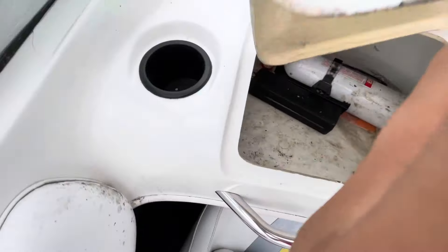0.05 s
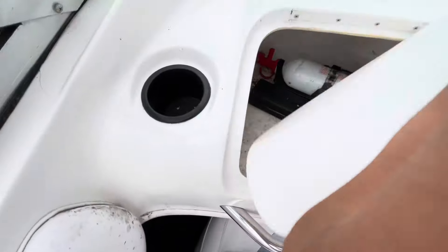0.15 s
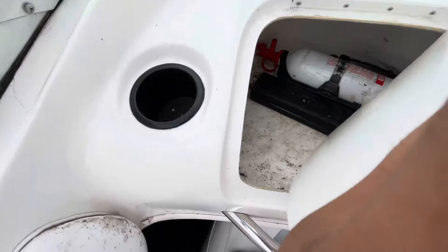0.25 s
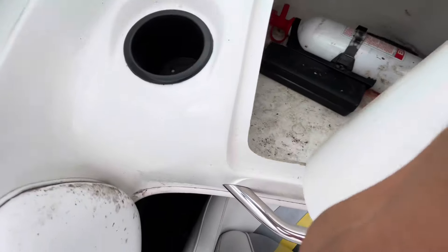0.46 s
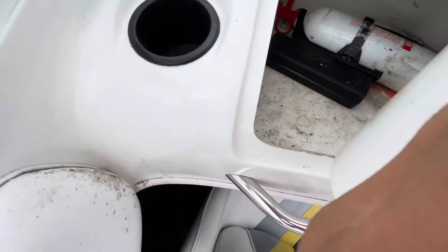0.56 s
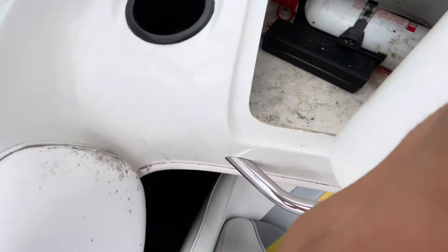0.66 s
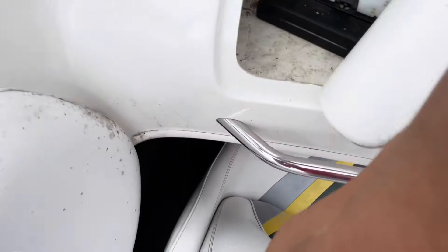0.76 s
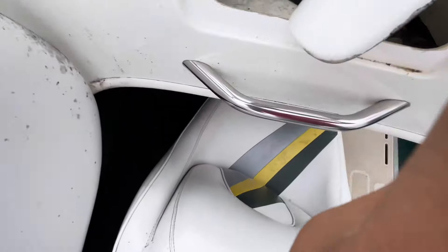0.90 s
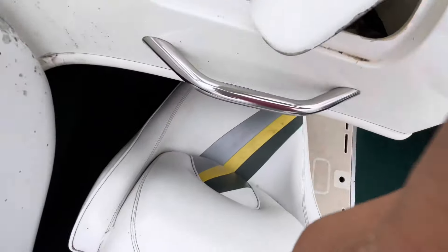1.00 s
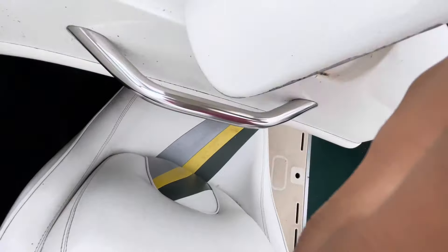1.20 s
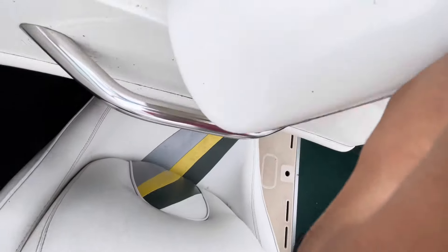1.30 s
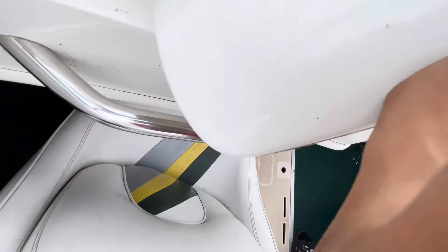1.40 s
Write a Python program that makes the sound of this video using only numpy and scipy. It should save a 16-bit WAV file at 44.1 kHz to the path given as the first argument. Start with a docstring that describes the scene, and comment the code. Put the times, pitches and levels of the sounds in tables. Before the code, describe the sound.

A fibreglass compartment lid on a boat knocks loudly twice, close by, with a latch rattle between. It scrapes and judders along the rim, then bumps down on its padding, over faint engine hum and outdoor hiss.

```python
"""A padded fibreglass compartment lid handled close by on a boat, over engine hum and outdoor hiss.
First two loud knocks, a latch rattle between: the edge cracks, the lid bends, the compartment booms.
Gain control ducks after them. The lid then scrapes and judders along the rim in stick-slip, tapping it.
Its cushion brushes past and the lid bumps down on it, from about 1.1 s. Last, wind rumble picks up."""
import sys
import numpy as np
from scipy import signal
from scipy.fft import rfft, irfft
from scipy.io import wavfile
from scipy.ndimage import uniform_filter1d

SR = 44100
rng = np.random.default_rng(int(sys.argv[2]) if len(sys.argv) > 2 else 0)


def generate_wav(signal):
    """Clip the signal to [-1, 1] and save it as 16-bit WAV at the path in sys.argv[1]."""
    frames = np.transpose(np.atleast_2d(signal))
    scaled = np.clip(frames, -1, 1) * 32767
    pcm = np.round(scaled).astype(np.int16)
    wavfile.write(sys.argv[1], SR, pcm)


N = 63945

# Spectra: level per Hz, shape only. Pan: left minus right. Phase: between the two microphone ports.
# Outdoor hiss: f/Hz, level/dB
HISS_SPECTRUM = [(30, 6), (200, -17.5), (400, -3), (560, -3), (680, -7), (810, 7), (1020, 1), (1200, -4.5),
                 (1400, -2), (2200, -11), (4000, -17), (6000, -31.5), (8000, -41), (11000, -65.5),
                 (14000, -81)]
# Distant whine: f/Hz, level/dB
WHINE_TONES = [(808, -55.5), (1040, -63)]
# Hiss and whine gain, rising as the microphone turns from the compartment: t/s, level/dB
OUTDOOR_GAIN = [(0, -7.5), (.45, 0.5), (.75, 0.5), (1.44, 0)]
# Wind on the microphone: f/Hz, level/dB
WIND_SPECTRUM = [(15, -24.5), (30, -17.5), (48, 0), (68, 3), (100, -11), (150, -4), (300, -46),
                 (1000, -72.5)]
# Gusts: t/s, level/dB
WIND_LEVEL = [(0, -43.5), (.15, -45), (.22, -44), (.45, -41), (.8, -40.5), (1.05, -39.5), (1.19, -32),
              (1.23, -29), (1.31, -35.5), (1.355, -28), (1.39, -32), (1.44, -31)]
# Hollow murmur of the shifting lid: f/Hz, level/dB
MURMUR_SPECTRUM = [(60, -20), (160, 4), (225, 6), (295, 7), (370, -14.5), (500, -19), (1200, -68)]
# Murmur envelope: t/s, level/dB
MURMUR_LEVEL = [(0, -35), (.1, -36.5), (.21, -35.5), (.27, -21), (.4, -43), (.6, -32), (.75, -52),
                (.97, -52.5), (1.04, -38), (1.1, -48.5), (1.2, -39.5), (1.27, -50), (1.44, -54)]
# Fine rustle: f/Hz, level/dB
RUSTLE_SPECTRUM = [(300, -28), (1500, 9.5), (4000, -0.5), (5600, -8.5), (7800, -21.5), (10300, -23),
                   (13000, -54.5), (16000, -69)]
# Rustle envelope: t/s, level/dB
RUSTLE_ENVELOPE = [(0, -50.5), (.16, -46.5), (.4, -53), (.7, -51.5), (.95, -68), (1.1, -53.5), (1.3, -53.5),
                   (1.44, -56)]
# Cushion brushing past: f/Hz, level/dB
BRUSH_SPECTRUM = [(200, -25), (500, -1.5), (820, 6), (1100, -12), (2500, -28), (8000, -56)]
# Brush strokes: t/s, length/s, level/dB
BRUSH_STROKES = [(0.68, 0.05, -37.5), (0.834, 0.054, -39.5), (1.031, 0.012, -39.5)]
# Sliding on the rim: f/Hz, level/dB
SCRAPE_SPECTRUM = [(200, -16.5), (430, 3), (600, -2), (900, -4), (1300, 7), (2200, 1), (4000, -4.5),
                   (6000, -8.5), (8500, -23), (11500, -18.5), (14000, -42.5)]
# Slides: t/s, length/s, level/dB, cutoff/Hz
RIM_SLIDES = [(0.162, 0.016, -40, 7060), (.436, 0.056, -37, 3000), (.492, 0.031, -36, 4840),
              (.563, 0.033, -40.5, 5000), (.59, 0.062, -40.5, 1970), (1.132, 0.034, -38.5, 2180),
              (1.254, 0.014, -39, 14000)]
# Edge rubbing the rim: t/s, length/s, slip rate/Hz, glide/fraction, fundamental/dB, octave/dB
RIM_RUBS = [(0.424, .085, 158, -.05, -31, -18.5), (0.502, .038, 150, -.05, -22, -16.5),
            (0.566, .095, 149, -.04, -21, -28)]
# Cushion cover: f/Hz, level/dB, t60/s, phase/rad
COVER_MODES = [(760, 2, 0.058, 0.23), (915, -0.5, 0.038, 0.043), (970, -2, .045, 0.0086),
               (1196, -4, 0.052, 0), (1600, -13, 0.049, 0.19)]
# Lid on its padding: f/Hz, level/dB, t60/s, phase/rad
CUSHION_MODES = [(176.7, 0, 0.14, 0.25), (276.9, 2.5, 0.057, 0.28), (352, -13.5, 0.082, 1),
                 (489, -7, 0.027, 1)]
# Cushion landings: t/s, pat/dB, thump/dB, thump delay/s, tuning/ratio, pan/dB
BUMPS = [(1.063, -54, -28, 0.001, 0.71, -6), (1.135, -21.5, -12.5, 0.0059, 0.98, -5.5),
         (1.171, -34, -19.5, 0.0059, 0.915, -5.5)]
# Latch snap: f/Hz, level/dB
SNAP_SPECTRUM = [(60, -29), (1100, 7.5), (2200, 11.5), (3000, 3.5), (4300, 6), (6200, -7.5), (7600, -14),
                 (8700, -14), (10000, -23), (12500, -15), (15500, -36)]
# Loose catch: f/Hz, level/dB, t60/s, phase/rad
LATCH_MODES = [(419, -29, 0.052, .01), (568, -22, 0.045, .01), (695, -17, 0.027, .01),
               (829, -13, 0.043, .01), (856.3, -17.5, 0.058, .01), (2100, -31, 0.21, 0.016),
               (4670, -27, 0.021, 0.014), (7460, -19.5, 0.0058, 0.013), (9900, -32.5, 0.0186, 0)]
# Latch clicks: t/s, snap/dB, ring/dB, ring pan/dB
LATCH_CLICKS = [(0.2923, -7.5, 4.5, 8.5), (0.3000, -13, -5, 11), (0.3025, -23, -1.5, 10)]
# Edge contact noise: f/Hz, level/dB
CRACK_SPECTRUM = [(40, -41), (500, 10.5), (690, 2), (1300, 3), (2800, -3.5), (4500, -12.5), (5300, -11.5),
                  (7500, -14.5), (8500, -19.5), (12500, -25), (15500, -35)]
# Stiff shell modes: f/Hz, level/dB, t60/s, phase/rad
SHELL_MODES = [(850, -13, .1, .97), (1052, -19, .13, .3), (1180, -14, .09, .27), (1335, -6.5, .045, -.76),
               (1470, -11, .05, -.87), (1640, -12, .05, .4), (1890, -6, .055, -.25), (2480, -12, .05, .75),
               (2850, -14, .09, .15), (3160, -17, .07, -1), (3580, -8, .035, -1), (3880, -17, .04, .5),
               (4240, -13, .03, -.5), (5380, -16, .035, .9)]
# Slow lid bending: f/Hz, level/dB, t60/s, phase/rad
BENDING_MODES = [(212.4, -11, 0.066, 0), (304.2, 0, 0.066, 0.62), (377, -6.5, 0.11, 1.4),
                 (534, -11.5, 0.1, 1.98), (630, -28.5, 0.13, 3.2), (766, -17.5, 0.1, 0.8)]
# Lid blows: t/s, crack/dB, crack cutoff/Hz, thump/dB, thump delay/s, flex/dB, boom/dB, boom/Hz,
# bending tuning/ratio, bending t60/ratio, body pan/dB, contact ring/Hz, contact ring/dB
BLOWS = [(0.2285, -9.5, 7420, -1.5, 0.0058, -6.5, -15, 151, 1, 1.46, 0, 546, -12.5),
         (0.3296, -11, 3890, 1.5, 0.005, -23, -5.5, 168.9, 1.044, 1.3, 2.5, 1410, -6.5),
         (0.351, -33.5, 3000, -9.5, 0.0027, -33.5, -11, 164.7, 0.77, 0.61, 0.5, 747, -15),
         (0.503, -35, 1586, -16.5, 0.00661, -46.5, -24, 157, 1.07, 1.5, -2, 1190, -25),
         (0.5674, -34, 2000, -15.5, 0.0043, -39, -22, 149.3, 1.014, 1.46, -1.5, 1194, -29)]


def amp(db):
    """dB to gain."""
    return 10 ** (np.asarray(db) / 20)


def unit(x):
    """Scale to rms 1."""
    return x / np.sqrt(np.mean(x ** 2) + 1e-20)


def pan(db):
    """Stereo gains for a left-minus-right level."""
    return amp(np.array([[db / 2], [-db / 2]]))


def level(points):
    """Scene-long gain from t/s, level/dB points."""
    return amp(np.interp(np.arange(N) / SR, *np.transpose(points)))


def add(mix, start_s, sound):
    """Mix in a stereo sound."""
    part = mix[:, max(round(start_s * SR), 0):][:, :sound.shape[1]]
    part += sound[:, :part.shape[1]]


def lowpass(x, cutoff_hz):
    """First-order low-pass."""
    return signal.sosfilt(signal.butter(1, cutoff_hz, fs=SR, output="sos"), x)


def noise(spectrum, size, coherence):
    """Coloured stereo noise, rms 1."""
    bins_hz = np.fft.rfftfreq(size, 1 / SR)
    hz, db = np.transpose(spectrum)
    left, other = np.exp(2j * np.pi * rng.random((2, len(bins_hz))))
    right = coherence * left + np.sqrt(1 - coherence ** 2) * other
    colour = amp(np.interp(np.log(bins_hz + 1), np.log(hz), db))
    return unit(irfft(np.array([left, right]) * colour, size))


def drift(bandwidth_hz, size=N):
    """Random wander, rms about 1."""
    hz = np.fft.rfftfreq(N, 1 / SR)
    return unit(irfft(rfft(rng.standard_normal(N)) * np.exp(-(hz / bandwidth_hz) ** 2), N))[:size]


def grit(size, grains_per_s, share):
    """Rough gain: steady part plus random grains."""
    impulses = 1. * (rng.random(N) < grains_per_s / SR)
    return 1 - share + share * unit(lowpass(impulses, cutoff_hz=450))[:size]


def attack(t, rise_s):
    """Linear onset."""
    return np.minimum(t / rise_s, 1)


def fade(t, t60_s):
    """Exponential decay."""
    return np.exp(-np.log(1000) * t / t60_s)


def ring(modes, t, tuning=1, t60_scale=1):
    """Damped stereo sines; adjacent modes in opposite polarity."""
    sides = np.array([[.5], [-.5]])
    return sum((-1) ** k * amp(db) * fade(t, t60_s * t60_scale)
               * np.sin(2 * np.pi * hz * tuning * t + sides * phase_rad)
               for k, (hz, db, t60_s, phase_rad) in enumerate(modes))


def mode(t, hz, db, t60_s, phase_rad=0):
    """One damped stereo sine."""
    return ring([(hz, db, t60_s, phase_rad)], t)


def wavering_tone(hz, depth, waver_hz):
    """Sine with wandering pitch, rms 1."""
    cycles = np.cumsum(hz * (1 + depth * drift(waver_hz))) / SR
    return unit(np.sin(2 * np.pi * cycles))


def outdoor_hiss(level_db=-45, patch_db=3):
    """Hiss, patchy in time and frequency."""
    spectrogram = signal.stft(noise(HISS_SPECTRUM, N, coherence=0), nperseg=512)[2]
    patches = uniform_filter1d(rng.standard_normal(spectrogram.shape[1:]), size=6, axis=0)
    patches = unit(uniform_filter1d(patches, size=10, axis=1))
    hiss = signal.istft(spectrogram * amp(patch_db * patches), nperseg=512)[1][:, :N]
    return amp(level_db) * pan(1.3) * hiss


def engine_hum(level_db=-42.5, flutter_db=2.8):
    """Low engine tone, unsteady in pitch and level."""
    tone = wavering_tone(hz=112.2, depth=.03, waver_hz=10.6)
    return amp(level_db + flutter_db * drift(18)) * pan(-9.5) * tone


def distant_whine(flutter_db=2):
    """Two faint wavering tones."""
    return sum(amp(db + flutter_db * drift(25)) * wavering_tone(hz, depth=.0115, waver_hz=31.2)
               for hz, db in WHINE_TONES)


def wind():
    """Gusts rumble on the microphone."""
    return level(WIND_LEVEL) * pan(-4) * noise(WIND_SPECTRUM, N, coherence=.42)


def handling():
    """The moving lid murmurs and rustles; its cushion brushes past."""
    murmur = level(MURMUR_LEVEL) * pan(-6.5) * noise(MURMUR_SPECTRUM, N, coherence=.9)
    rustle = level(RUSTLE_ENVELOPE) * noise(RUSTLE_SPECTRUM, N, coherence=.078)
    out = murmur + rustle
    for start_s, length_s, db in BRUSH_STROKES:
        size = round(length_s * SR)
        brush = noise(BRUSH_SPECTRUM, N, coherence=.074)[:, :size]
        add(out, start_s, amp(db) * np.hanning(size) * brush)
    return out


def rim_scrapes():
    """Short slides: grainy hiss swells fast and dies away."""
    out = np.zeros((2, N))
    for start_s, length_s, db, cutoff_hz in RIM_SLIDES:
        progress = np.linspace(0, 1, round(length_s * SR))
        swell = np.sin(np.pi * progress ** .7)
        friction = noise(SCRAPE_SPECTRUM, N, coherence=.25) * grit(N, grains_per_s=1100, share=.35)
        add(out, start_s, amp(db) * swell * lowpass(friction, cutoff_hz)[:, :len(swell)])
    return out


def rim_judder(jitter=.04, flutter_db=2.5):
    """Stick-slip locks on to a lid resonance and groans."""
    out = np.zeros((2, N))
    for start_s, length_s, slip_hz, glide, fundamental_db, octave_db in RIM_RUBS:
        size = round(length_s * SR)
        progress = np.linspace(0, 1, size)
        pitch_hz = slip_hz * (1 + glide * (progress - .5) + jitter * drift(88, size))
        phase_rad = 2 * np.pi * np.cumsum(pitch_hz) / SR
        groan = sum(amp(db + flutter_db * drift(97, size)) * np.sin(k * phase_rad)
                    for k, db in enumerate([fundamental_db, octave_db], 1))
        add(out, start_s, np.sin(np.pi * progress) * pan(-6) * groan)
    return out


def cushion_bumps():
    """The padded side lands: the cover pats, then the cushion gives with a dull thump."""
    out, t = np.zeros((2, N)), np.arange(SR // 5) / SR
    for start_s, pat_db, thump_db, delay_s, tuning, pan_db in BUMPS:
        pat = amp(pat_db) * ring(COVER_MODES, t) * attack(t, rise_s=.005)
        thump = amp(thump_db) * ring(CUSHION_MODES, t, tuning) * attack(t, rise_s=.0047)
        add(out, start_s, pat)
        add(out, start_s + delay_s, pan(pan_db) * thump)
    return out


def latch_rattle():
    """Each click: a bright snap and the short ring of the loose catch."""
    out, t = np.zeros((2, N)), np.arange(SR // 8) / SR
    envelope = fade(t, t60_s=.0066) + amp(-18) * fade(t, t60_s=.13)
    for start_s, snap_db, ring_db, pan_db in LATCH_CLICKS:
        snap = amp(snap_db) * pan(.5) * envelope * noise(SNAP_SPECTRUM, len(t), coherence=.19)
        catch = amp(ring_db) * pan(pan_db) * ring(LATCH_MODES, t)
        add(out, start_s, (snap + catch) * attack(t, rise_s=.00076))
    return out


def shell_crack(t, hold_s=.003, resonance_db=7, width_hz=55):
    """Contact noise coloured by the shell, with a gritty tail; the shell modes ring."""
    bins_hz = np.fft.rfftfreq(4096, 1 / SR)[1:]
    peaks = np.max([np.exp(-((bins_hz - hz) / width_hz) ** 2) for hz, *_ in SHELL_MODES], axis=0)
    hz, db = np.transpose(CRACK_SPECTRUM)
    colour_db = np.interp(np.log(bins_hz), np.log(hz), db) + resonance_db * peaks
    burst = fade(np.maximum(t - hold_s, 0), t60_s=.012)
    tail = amp(-4.5) * fade(t, t60_s=.13) * grit(len(t), grains_per_s=830, share=.33)
    contact = noise(np.column_stack([bins_hz, colour_db]), len(t), coherence=.069)
    return contact * (burst + tail) + amp(1) * ring(SHELL_MODES, t)


def lid_knocks():
    """The hard edge cracks and rings; a few ms later the lid bends and the compartment booms."""
    out, t = np.zeros((2, N)), np.arange(SR // 3) / SR
    for (start_s, crack_db, cutoff_hz, thump_db, delay_s, flex_db, boom_db, boom_hz,
         tuning, t60_scale, pan_db, contact_hz, contact_db) in BLOWS:
        crack = amp(crack_db) * lowpass(shell_crack(t), cutoff_hz)
        contact = mode(t, contact_hz, contact_db, t60_s=.071)
        add(out, start_s, pan(.5) * (crack + contact) * attack(t, rise_s=.002))
        thump = amp(thump_db) * ring(BENDING_MODES, t, tuning, t60_scale)
        flex = mode(t, hz=90, db=flex_db, t60_s=.079, phase_rad=1.2)
        boom = pan(-8) * mode(t, boom_hz, boom_db, t60_s=.2, phase_rad=.6)
        add(out, start_s + delay_s, pan(pan_db) * (thump + flex + boom) * attack(t, rise_s=.0047))
    return out


def scene(port_delay_s=.0002683, low_cut_hz=60):
    """The lid radiates little deep bass and reaches the left port first; background behind it."""
    contacts = lid_knocks() + cushion_bumps() + latch_rattle() + rim_judder() + rim_scrapes()
    left, right = signal.sosfilt(signal.butter(2, low_cut_hz, "highpass", fs=SR, output="sos"), contacts)
    t = np.arange(N) / SR
    lid = np.array([left, np.interp(t - port_delay_s, t, right)]) + handling()
    hiss, hum = outdoor_hiss(), engine_hum()
    return lid + hum + level(OUTDOOR_GAIN) * (hiss + distant_whine()) + wind()


def record(dry, threshold_db=-17, slope=.6, recover_db_per_s=30, band_edge_hz=15900):
    """Gain control ducks after loud blows and recovers; then soft clip and band limit."""
    power = lowpass((dry ** 2).mean(0), cutoff_hz=23)
    power_db = 10 * np.log10(np.maximum(power, 1e-12))
    recovery_db = np.arange(N) / SR * recover_db_per_s
    held_db = np.maximum.accumulate(power_db + recovery_db) - recovery_db  # falling peak hold
    over_db = np.maximum(held_db - threshold_db, 0)
    ducked = dry / amp(slope * lowpass(over_db, cutoff_hz=4.9))
    limited = ducked / (1 + ducked ** 8) ** (1 / 8)
    band_limit = signal.firwin(511, band_edge_hz, window=("kaiser", 9), fs=SR)
    return signal.oaconvolve(limited, band_limit[None], "same")


dry = scene()
out = record(dry)
generate_wav(out)
```